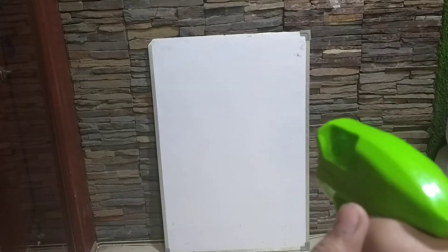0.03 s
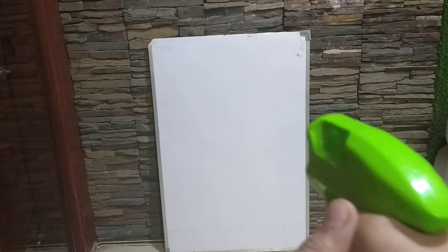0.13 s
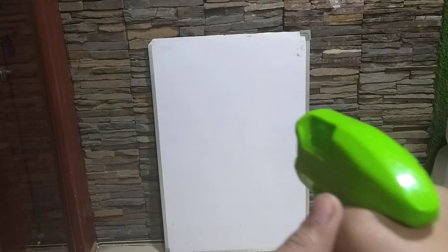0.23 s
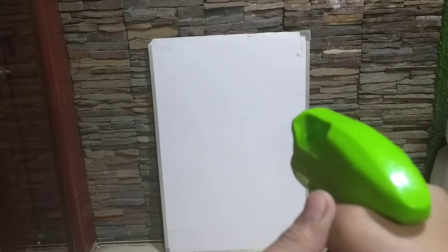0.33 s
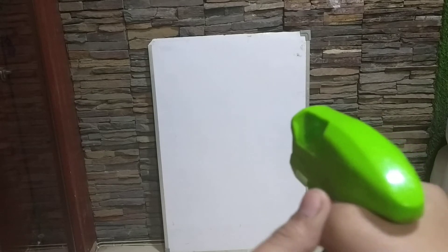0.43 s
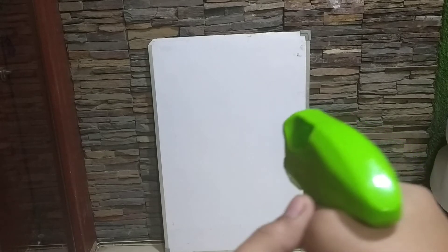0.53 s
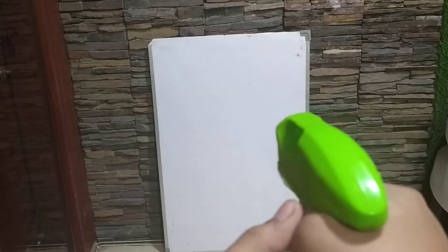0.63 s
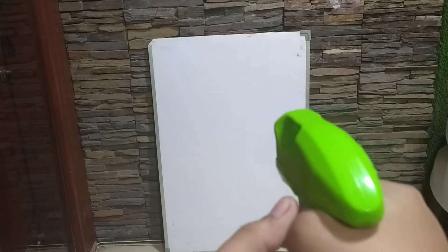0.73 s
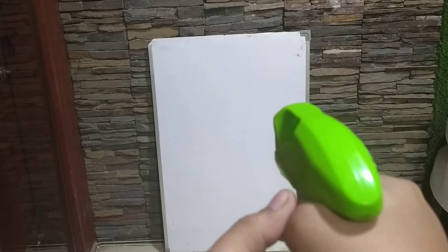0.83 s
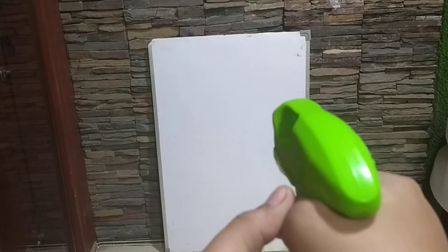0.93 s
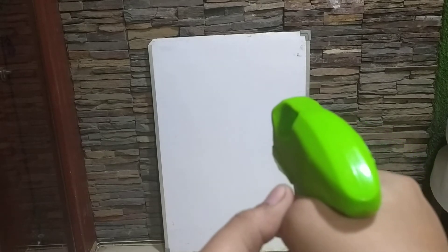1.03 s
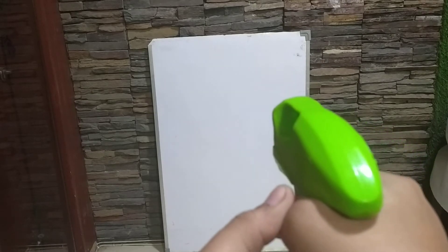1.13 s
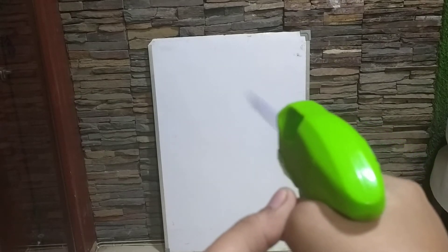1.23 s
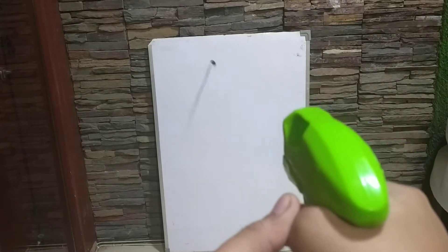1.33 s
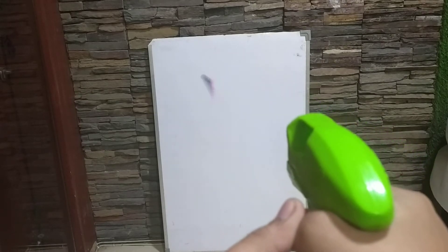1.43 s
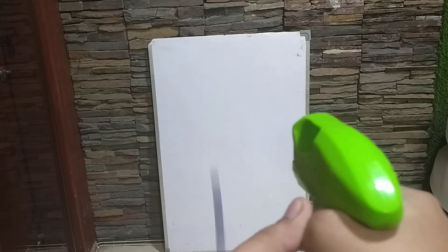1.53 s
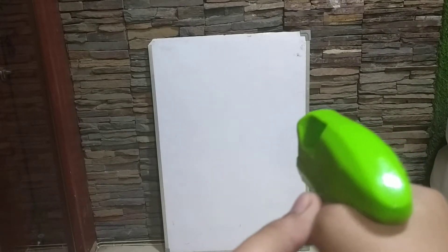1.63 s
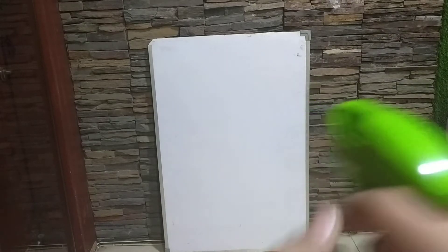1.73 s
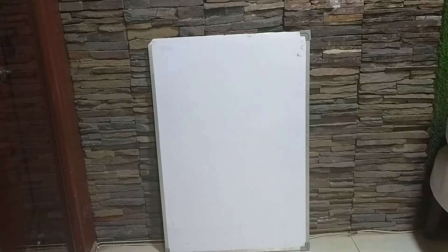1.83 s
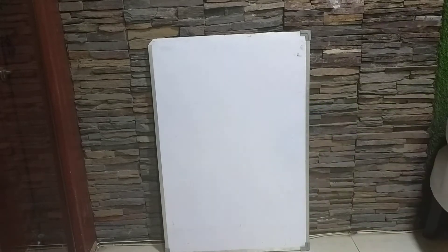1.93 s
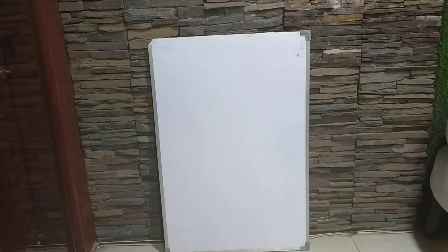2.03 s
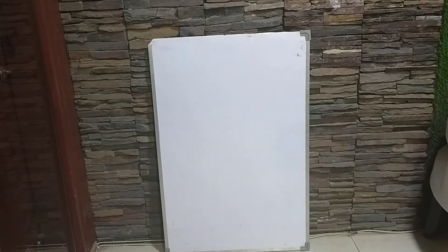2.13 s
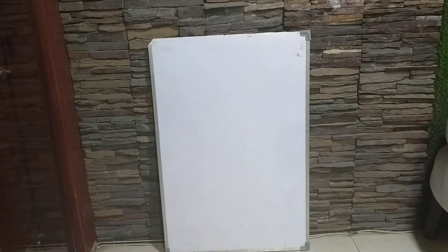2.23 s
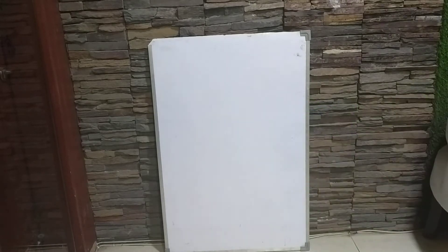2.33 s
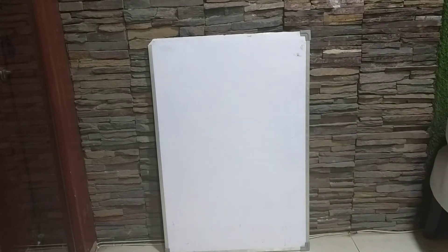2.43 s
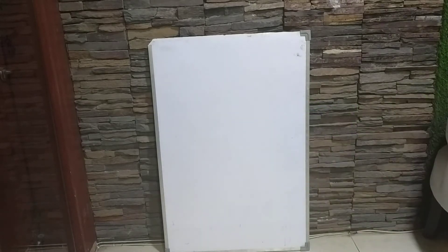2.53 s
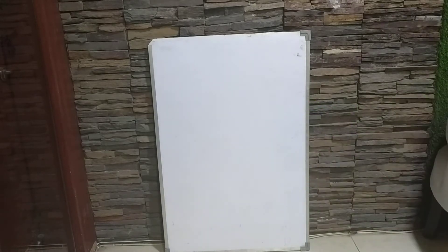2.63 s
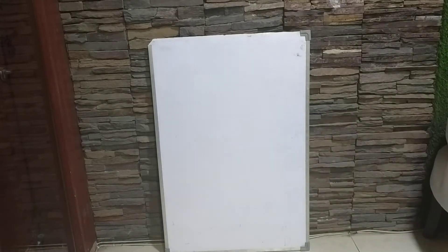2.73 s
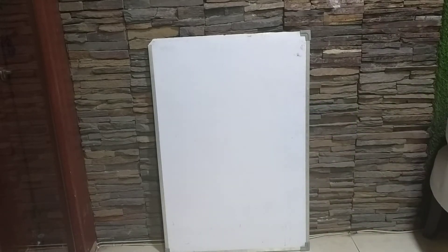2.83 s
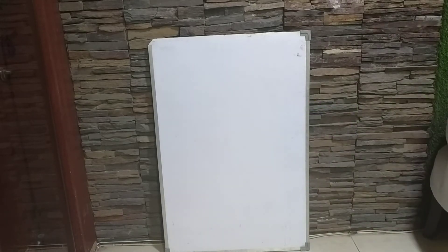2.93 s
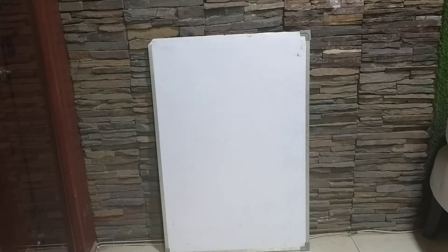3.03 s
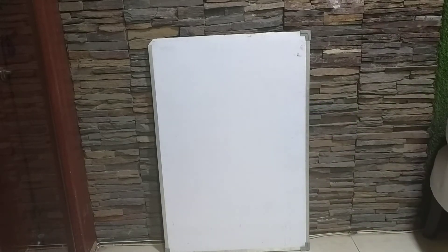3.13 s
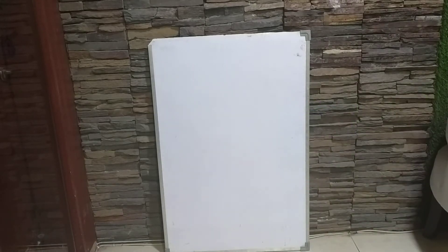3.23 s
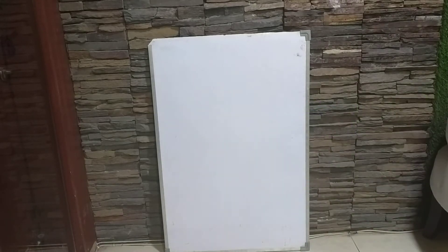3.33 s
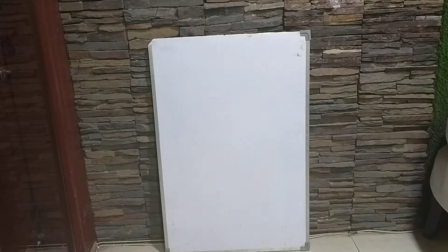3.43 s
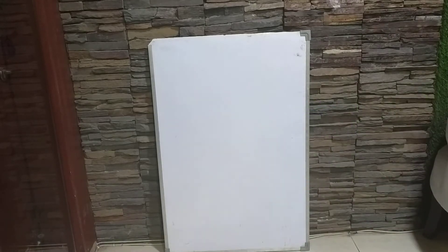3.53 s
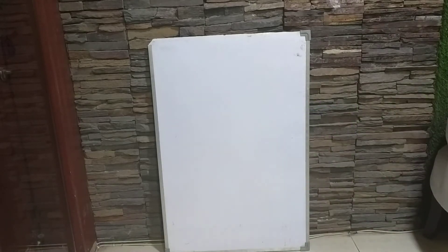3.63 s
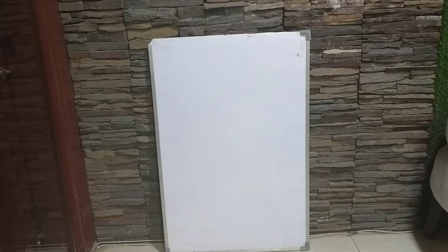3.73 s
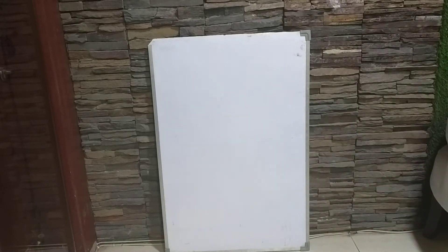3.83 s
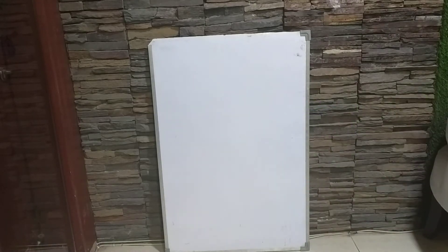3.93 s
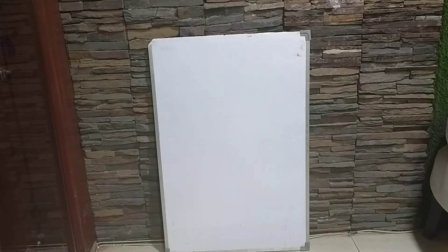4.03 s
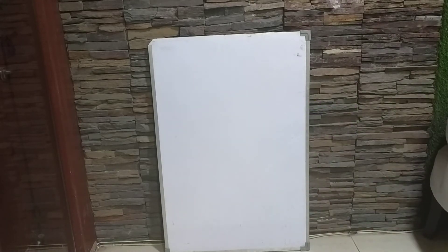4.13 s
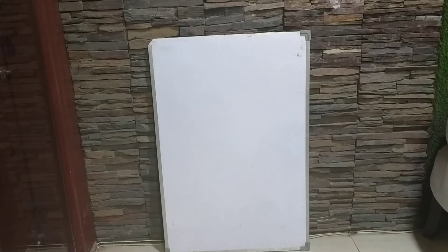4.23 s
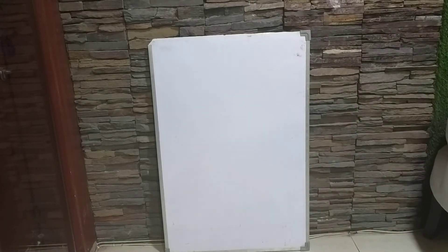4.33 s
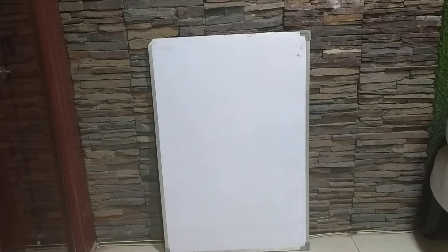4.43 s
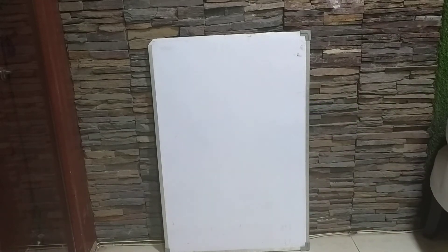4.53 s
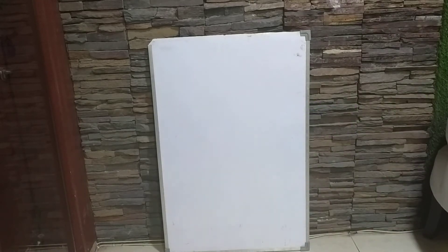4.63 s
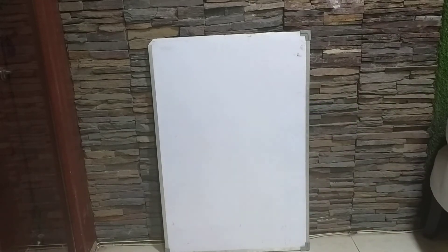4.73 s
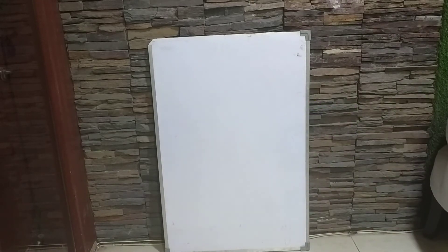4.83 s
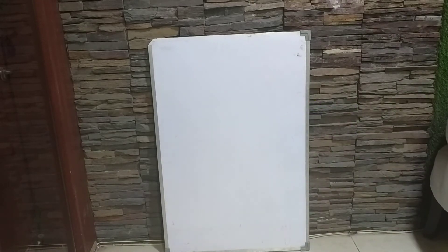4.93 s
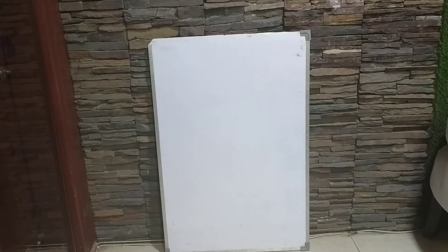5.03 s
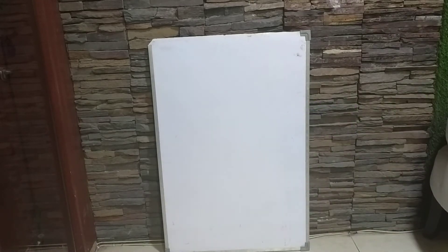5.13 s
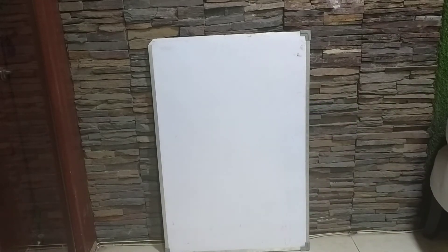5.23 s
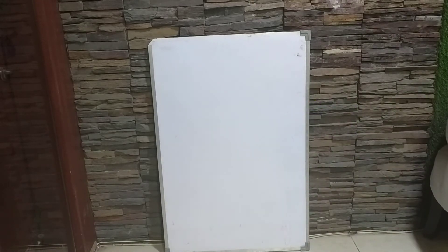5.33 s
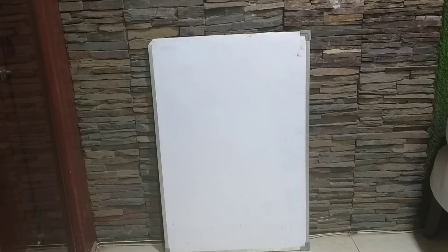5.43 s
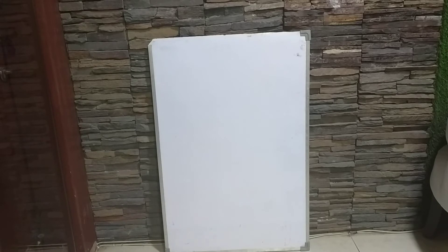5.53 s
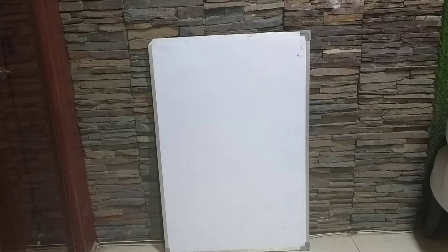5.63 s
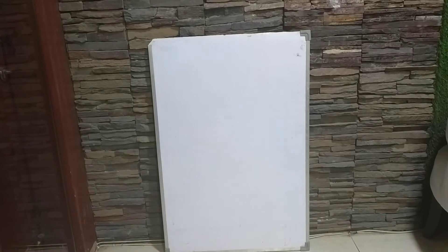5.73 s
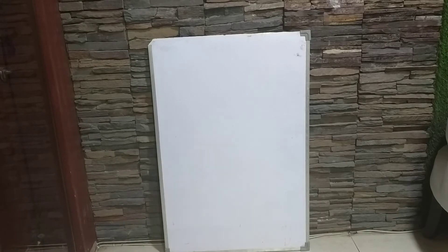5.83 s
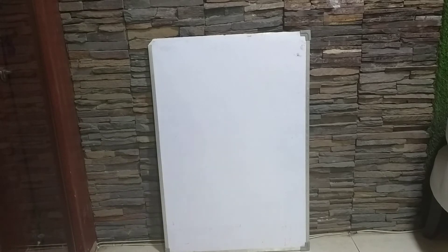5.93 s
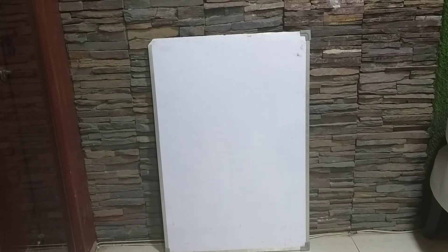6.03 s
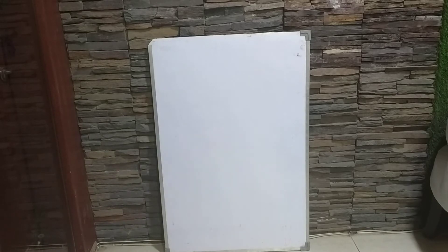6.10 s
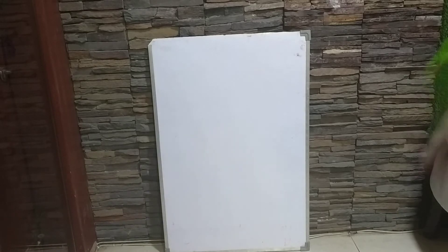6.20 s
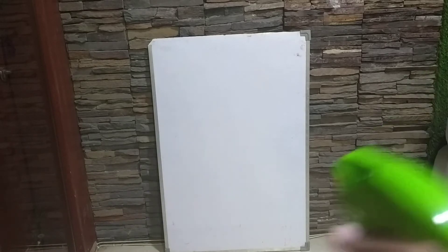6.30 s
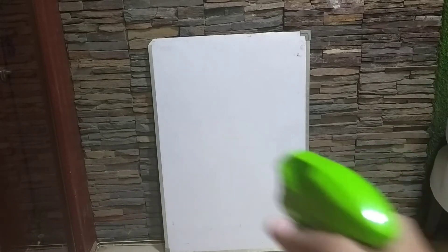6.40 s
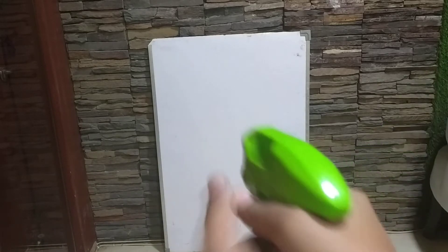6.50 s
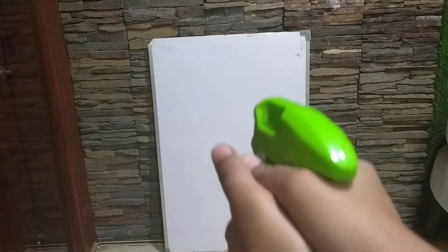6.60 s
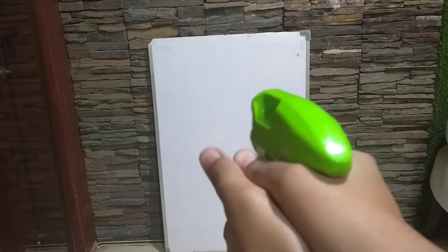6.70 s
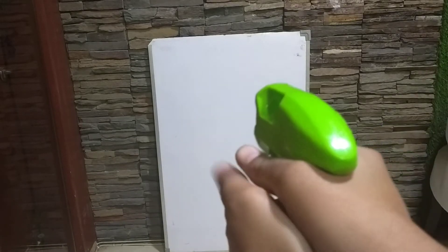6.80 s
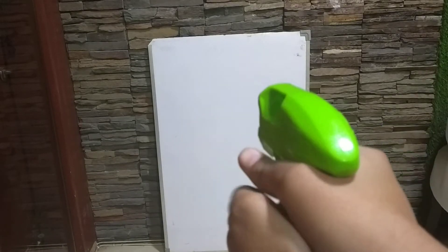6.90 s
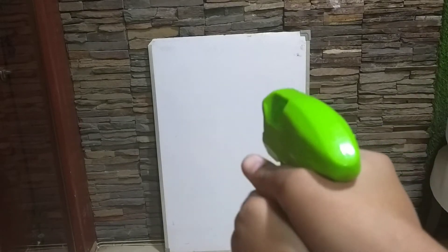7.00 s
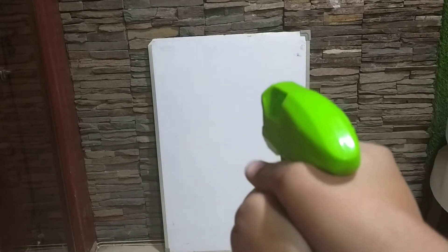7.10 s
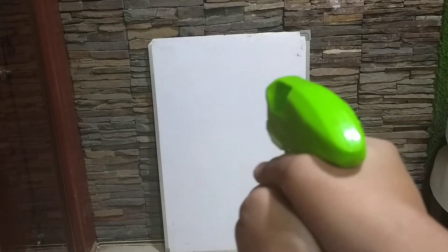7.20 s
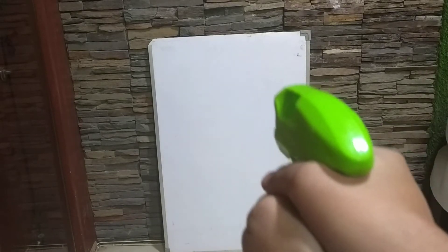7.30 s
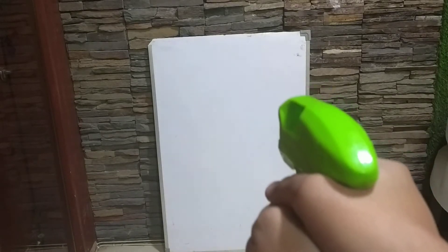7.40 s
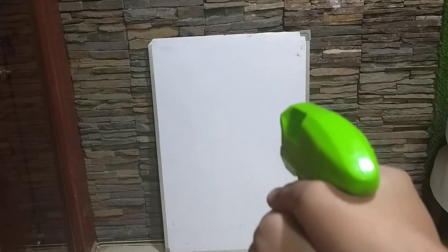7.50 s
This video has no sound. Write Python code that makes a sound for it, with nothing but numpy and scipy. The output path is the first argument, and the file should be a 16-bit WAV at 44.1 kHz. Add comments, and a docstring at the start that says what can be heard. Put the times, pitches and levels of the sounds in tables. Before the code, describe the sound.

A toy blaster snaps sharply, its dart slaps a board an instant later and drops, then quiet plastic clicks and rubbing of reloading.

```python
"""A spring toy blaster fires a foam dart at a whiteboard in a small, hard-walled room with a faint low rumble.
First the catch lets go: filtered noise bursts form the snap; damped modes the recoil, pop, spring and shell.
A tenth of a second later the dart slaps the board, whose panel modes boom, and it then drops to the floor.
Last come cocking and reloading close to a two-port microphone: bursts of noise for the clicks and knocks,
swelling bands of noise for the rubbing. Decaying noise, slower or faster with frequency, answers as the walls."""
import sys
import numpy as np
from scipy import signal
from scipy.fft import rfft, irfft, next_fast_len
from scipy.io import wavfile
from scipy.ndimage import uniform_filter1d, map_coordinates

SR = 44100
rng = np.random.default_rng(int(sys.argv[2]) if len(sys.argv) > 2 else 0)


def store_wav(level_fs):
    """Save 16-bit WAV to argv[1]."""
    pcm = np.round(np.clip(np.atleast_2d(level_fs), -1, 1) * 32767)
    wavfile.write(sys.argv[1], SR, pcm.T.astype(np.int16))


N = 333396
AGE = np.arange(SR) / SR  # time since a blow (s)
CLOCK = np.arange(N) / SR  # time in the scene (s)

# Steady room noise, a rumble with thin hiss. Each row: frequency in Hz, relative level in dB.
AIR_SPECTRUM = [(12, -30), (20, 1), (43, 0), (60, -13), (86, -9.5), (113, -19), (146, -13), (182, -26.5),
                (220, -21), (260, -25.5), (301, -22.5), (590, -38), (698, -35), (949, -40), (4000, -45.5),
                (6720, -45.5), (9500, -43.5), (12100, -45.5), (16000, -67.5)]
# Swells of a far whine. Each row: middle in seconds, level in dB, length in seconds.
WHINE_SWELLS = [(.8, -94.5, .8), (5.95, -89, 0.43)]
# Decay of the walls' answer. Each row: frequency in Hz, t60 in seconds.
WALL_DECAY = [(120, .45), (400, .38), (1000, .52), (3000, 0.52), (8000, .48), (11000, .42), (15000, 0.18)]
# Coherence of the direct sound at the two ports. Each row: frequency in Hz, left-right likeness from 0 to 1.
DIRECT_LIKENESS = [(600, 0.99), (3000, 1), (6000, 0.5), (12000, 0.24)]

# Plastic sliding on plastic. Each row: middle in seconds, level in dB, length in seconds.
SLIDE_STROKES = [(1.95, -71, 0.076), (2.11, -73, 0.11), (2.36, -76.5, .2), (3.02, -58.5, 0.054),
                 (3.37, -75, 0.082), (3.53, -77, .1), (3.72, -69.5, 0.22), (4.04, -75.5, 0.18),
                 (4.21, -73.5, .12), (4.36, -68, 0.049), (4.49, -73, .045), (4.64, -71, 0.045),
                 (4.85, -79, .08), (5.0, -69.5, 0.043), (5.08, -60.5, 0.049), (5.205, -64.5, 0.029),
                 (5.46, -77, .09), (5.605, -70, 0.062), (5.82, -66.5, 0.11), (6.08, -76.5, .36),
                 (6.51, -80.5, .24)]
# Fingers scuffing the hollow shell. Each row: middle in seconds, level in dB, length in seconds.
SCUFF_STROKES = [(3.71, -71, 0.12), (4.08, -80, 0.26), (5.08, -82, 0.084)]
# Friction noise of the slides. Each row: frequency in Hz, relative level in dB.
SLIDE_SPECTRUM = [(300, -33), (1500, -12), (3000, -11), (4400, -7), (6000, -7), (9300, 1), (12000, -7.5),
                  (15500, -14.5)]
# Friction noise of the scuffs. Each row: frequency in Hz, relative level in dB.
SCUFF_SPECTRUM = [(80, -1), (300, -1), (700, -0.5), (1000, -3), (1500, -4.5), (2100, -5), (4000, -13.5),
                  (10000, -40)]
# Plastic clicks of the trigger and of cocking. Each row: start in seconds, level in dB, t60 in seconds.
CLICK_BLOWS = [(1.6727, -47, 0.016), (2.347, -60.5, 0.025), (2.551, -38, 0.019), (2.5548, -37, 0.023),
               (2.5777, -40, 0.018), (2.5978, -20, 0.0086), (2.6016, -35, 0.073), (2.633, -46, .006),
               (2.9240, -48.5, .014), (2.9323, -51.5, 0.028), (4.625, -65.5, .039), (5.2228, -52, 0.026),
               (5.2333, -56, .02), (6.5230, -63.5, 0.019)]
# Colour of the clicking shell. Each row: frequency in Hz, relative level in dB.
SHELL_SPECTRUM = [(100, -28), (300, -7.5), (700, -20), (1500, -8.5), (2100, -10), (2600, -9), (3300, -6.5),
                  (4300, -1.5), (5300, -1.5), (7500, -1.5), (9500, 7.5), (12000, -2), (15500, -9)]
# Dart on the floor and hands on the shell.
# Each row: start in seconds, level in dB, t60 in seconds, resonance in Hz.
KNOCK_BLOWS = [(1.842, -45, 0.027, 518), (1.8515, -51.5, 0.017, 900), (2.2652, -58.5, .022, 620),
               (2.4604, -64, 0.03, 2500), (2.4936, -63, .03, 1700), (2.5391, -54, 0.018, 815),
               (2.55, -56.5, 0.039, 1800), (2.7142, -59.5, 0.03, 1390), (3.012, -59.5, 0.083, 1550),
               (3.645, -67, 0.2, 200), (3.715, -72, .18, 130), (3.97, -75, 0.18, 300),
               (4.8742, -68, .023, 870), (5.07, -73, .1, 1800), (5.098, -69.5, 0.091, 1460),
               (5.464, -73, .04, 1050), (6.498, -73, .053, 1500)]
# Dull colour shared by the knocks, before each one's resonance. Each row: frequency in Hz, relative level in dB.
KNOCK_SPECTRUM = [(60, -23), (150, -8), (400, -5), (700, -7), (1300, -7.5), (2500, -13.5), (5500, -16),
                  (9200, -7.5), (12000, -18), (16000, -35)]

# The dart's tip slaps the board, which chatters in its frame.
# Each row: start in seconds, level in dB, t60 in seconds, room answer in dB.
BOARD_SLAPS = [(1.3423, -11, 0.0024, 1.5), (1.3434, -14, 0.0063, -1), (1.3454, -16.5, 0.0078, -2.5),
               (1.3527, -18.5, 0.0074, -3.5)]
# Colour of the tip's slap. Each row: frequency in Hz, relative level in dB.
TIP_SPECTRUM = [(100, -12.5), (300, 9.5), (850, 5.5), (1500, 0), (3200, -1.5), (4000, -1.5), (4650, -2),
                (5500, 1), (7500, 6.5), (9500, 6), (12000, -0.5), (15500, -5.5)]
# Modes of the board's panel. Each row: frequency in Hz, level in dB, t60 in seconds.
BOARD_MODES = [(168, -49.5, .2), (277, -36.5, 0.12), (337.8, -30.5, 0.18), (382, -34.5, 0.23),
               (487.7, -27.5, 0.22), (618.3, -34.5, 0.1), (687.7, -32.5, 0.15), (773, -36.5, 0.14),
               (833, -32, 0.15), (965, -37.5, 0.21), (1290, -43, .25)]

# The catch lets go and the plunger slams home.
# Each row: start in seconds, level in dB, t60 in seconds, room answer in dB.
SHOT_BLOWS = [(1.2367, -19, .02, -6.5), (1.2439, -18.5, 0.039, -8), (1.2484, -18.5, 0.073, -8.5)]
# Colour of the shot's snap. Each row: frequency in Hz, relative level in dB.
SNAP_SPECTRUM = [(100, -10), (300, -5), (700, -2.5), (1050, 2), (1550, 2.5), (1950, -7), (2600, 1.5),
                 (3700, -2), (5300, -4), (7500, 1), (10000, 2), (12500, -5), (15500, -7)]
# Air modes of the barrel. Each row: frequency in Hz, level in dB, t60 in seconds.
BARREL_MODES = [(806, -6, .019), (596, -19.5, 0.0079), (1116, -14.5, 0.023), (2540, -22, 0.028),
                (2752, -26, 0.032)]
# Modes of the recoil. Each row: frequency in Hz, level in dB, t60 in seconds.
RECOIL_MODES = [(177, -22.5, 0.031), (126.5, -41.5, 0.26), (104.7, -45, 0.24)]
# Modes of the spring and shell. Each row: frequency in Hz, level in dB, t60 in seconds.
SPRING_AND_SHELL_MODES = [(1510, -50.5, 1.0), (2485.6, -46.5, .35), (942, -41.5, 0.35), (1256, -44.5, 0.28)]

RECOIL_S, POP_S, BOARD_S = 1.2378, 1.2440, 1.3428  # starts (s)
LEFT_LEAD_S = .00004  # the shot reaches the left port first (s)
PORT_GAP_M, SOUND_SPEED = .13, 343  # between the microphone ports (m), of sound (m/s)
TOP_HZ = 16000  # band limit of the recorder (Hz)
CLICK_ROOM_DB, BUMP_ROOM_DB = -2.5, -1  # the walls' answer over the direct sound (dB)
STROKE_TAIL_DB, STROKE_T60_S = -5, 0.85  # what lingers of a stroke in the room (dB, s)
SLIDE_SCUFF_DB = -21.5  # every slide also stirs the shell a little (dB)
RUMBLE_DB = -65  # steady room noise (dB)
WHINE_HZ, WHINE_WAVER_HZ = 710, 2.0  # centre of the whine and scale of its random wavering (Hz)


def amp(db):
    """Level law: twenty decibels make a tenfold amplitude."""
    return 10 ** (np.asarray(db) / 20)


def unit(x):
    """Normalisation to a root-mean-square value of 1."""
    return x / np.sqrt(np.mean(x ** 2) + 1e-20)


def along(points, hz):
    """Interpolation of (Hz, value) points on a logarithmic frequency axis."""
    f, v = np.transpose(points)
    return np.interp(np.log(hz + 1), np.log(f + 1), v)


def wobble(rate):
    """Band-limited randomness: a smooth curve through random knots, rate of them a second."""
    knots = rng.standard_normal(int(N * rate / SR) + 4)
    return map_coordinates(knots, [CLOCK * rate])


def filtered(x, response):
    """Linear filtering: the spectrum of x times a response of frequency."""
    n = x.shape[-1]
    m = next_fast_len(n + SR // 2)
    hz = np.fft.rfftfreq(m, 1 / SR)
    return irfft(rfft(x, m) * response(hz), m)[..., :n]


def causal(level_db, size=2048):
    """Minimum phase: folding the cepstrum gives a level curve its causal impulse response, of energy 1."""
    magnitude = amp(level_db(np.fft.rfftfreq(size, 1 / SR)))
    cepstrum = irfft(np.log(magnitude))
    cepstrum[1:size // 2] *= 2
    cepstrum[size // 2 + 1:] = 0
    response = irfft(np.exp(rfft(cepstrum)))
    return response / np.linalg.norm(response)


def diffuse(hz):
    """Diffuse-field coherence: a sinc of port spacing over wavelength, for sound from all sides."""
    return .975 * np.sinc(2 * hz * PORT_GAP_M / SOUND_SPEED)


def spread(two, likeness):
    """Coherence by mid-side mixing: two unrelated signals become left and right of a given likeness."""
    def rotation(hz):
        turn = np.arccos(np.clip(likeness(hz), -1, 1)) / 2
        return np.array([np.cos(turn), np.sin(turn)])

    mid, side = filtered(two, rotation)
    return np.array([mid + side, mid - side])


def rush(spectrum, patchy_db, grain_db=0):
    """Random noise, diffuse and of rms 1, whose colour shifts in patches; grain_db breaks it into tiny slips."""
    grainy = rng.standard_normal((2, N)) * amp(grain_db * wobble(400))
    z = signal.stft(grainy, nperseg=1024)[2]
    patches = rng.standard_normal(z.shape[1:])
    patches = uniform_filter1d(patches, size=7, axis=0)  # over frequency
    patches = uniform_filter1d(patches, size=8, axis=1)  # over time
    noise = signal.istft(z * amp(patchy_db * unit(patches)), nperseg=1024)[1][:, :N]
    return unit(filtered(spread(noise, diffuse), lambda hz: amp(along(spectrum, hz))))


def add(track, s, sound):
    """Superposition: a sound is summed into the track at s seconds."""
    part = track[:, round(s * SR):][:, :sound.shape[-1]]
    part += sound[..., :part.shape[-1]]


def in_room(sound, room_db, build=0.002):
    """Reverberation: the walls' answer builds up, then decays at its own speed at each frequency."""
    hz, t, z = signal.stft(rng.standard_normal((2, SR)), SR, nperseg=256)
    decay = amp(-60 * t / along(WALL_DECAY, hz)[:, None])
    tail = signal.istft(z * decay, SR, nperseg=256)[1][:, :SR]
    tail = spread(tail, diffuse) * (1 - np.exp(-(AGE / build) ** 2))
    tail = tail / np.linalg.norm(tail[0])
    source = np.atleast_2d(sound)[:1]  # the left channel excites the walls
    answer = signal.fftconvolve(source, tail, axes=1)
    return sound + amp(room_db) * answer[:, :SR]


def swells(table):
    """Gaussian power envelopes: each swell is at half power at the ends of its length."""
    return sum(amp(db) ** 2 * .5 ** ((2 * (CLOCK - s) / length) ** 2) for s, db, length in table)


def background():
    """Stationary noise, a low rumble with thin hiss, and a frequency-modulated far whine that comes and goes."""
    air = amp(RUMBLE_DB) * rush(AIR_SPECTRUM, patchy_db=1.5)
    whine_hz = WHINE_HZ + WHINE_WAVER_HZ * wobble(6)
    phase = 2 * np.pi * np.cumsum(whine_hz) / SR
    return air + np.sqrt(swells(WHINE_SWELLS)) * unit(np.sin(phase))


def contact(t60, body):
    """Impact excitation: a decaying crackle convolved with the response of the struck body, in stereo."""
    fade = amp(-60 * AGE / t60)
    crackle = rng.standard_normal((2, SR)) * fade
    crackle *= np.linalg.norm(fade) / np.linalg.norm(crackle, axis=1, keepdims=True)
    direct = spread(crackle, lambda hz: along(DIRECT_LIKENESS, hz))
    return signal.fftconvolve(direct, body[None], axes=1)[:, :SR]


def contacts(table, spectrum):
    """Repeated impact: a series of contacts on one body, each answered by the room."""
    track = np.zeros((2, N))
    body = causal(lambda hz: along(spectrum, hz))
    for s, db, t60, room_db in table:
        add(track, s, amp(db) * in_room(contact(t60, body), room_db))
    return track


def strokes(table):
    """Friction envelopes: each hand stroke speeds up, slows down and lingers by exponential room decay."""
    power = swells(table)
    decay = amp(-60 * AGE / STROKE_T60_S) ** 2
    lingering = signal.fftconvolve(power, decay / decay.sum())[:N]
    return np.sqrt(np.abs(power + amp(STROKE_TAIL_DB) ** 2 * lingering))


def reloading():
    """Impact and friction: plastic clicks, gritty hissing slides, and fingers scuffing the hollow shell."""
    sliding = strokes(SLIDE_STROKES)
    scuffing = np.hypot(strokes(SCUFF_STROKES), amp(SLIDE_SCUFF_DB) * sliding)  # powers add
    slide = sliding * rush(SLIDE_SPECTRUM, patchy_db=2.5, grain_db=1.5)
    scuff = scuffing * rush(SCUFF_SPECTRUM, patchy_db=4.0, grain_db=2.5)
    clicks = contacts([(*click, CLICK_ROOM_DB) for click in CLICK_BLOWS], SHELL_SPECTRUM)
    return clicks + slide + scuff


def knocks(ring_db=14, octaves=0.24):
    """Local resonance: soft knocks and scrapes, where each spot that is touched has its own spectral peak."""
    track = np.zeros((2, N))
    for s, db, t60, ring_hz in KNOCK_BLOWS:
        def level_db(hz):
            distance = np.log2((hz + 1) / ring_hz) / octaves
            return along(KNOCK_SPECTRUM, hz) + ring_db / (1 + distance ** 2)

        add(track, s, amp(db) * in_room(contact(t60, causal(level_db)), BUMP_ROOM_DB))
    return track


def ring(modes, attack):
    """Modal superposition: damped sines swell over the attack time (s), neighbours in opposite directions."""
    swing = 0
    for k, (hz, db, t60) in enumerate(modes):
        swing = swing + (-1) ** k * amp(db - 60 * AGE / t60) * np.sin(2 * np.pi * hz * AGE)
    return swing * (1 - np.exp(-AGE / attack))


def whiteboard():
    """Plate vibration: the dart slaps the board, whose panel takes a few milliseconds to start booming."""
    track = contacts(BOARD_SLAPS, TIP_SPECTRUM)
    add(track, BOARD_S, in_room(ring(BOARD_MODES, attack=0.0045), room_db=-12.0))
    return track


def blaster():
    """Impulsive release: a snap, recoil, the barrel air's pop as the dart leaves; spring and shell ring on."""
    track = contacts(SHOT_BLOWS, SNAP_SPECTRUM)
    add(track, RECOIL_S, in_room(ring(RECOIL_MODES, attack=.001), room_db=-13))
    add(track, POP_S, in_room(ring(BARREL_MODES, attack=.0006), room_db=-12.5, build=.003))
    add(track, POP_S, ring(SPRING_AND_SHELL_MODES, attack=.002))
    sides = np.array([[1], [-1]])  # left early and louder, right late and softer
    shifted = filtered(track, lambda hz: np.exp(1j * np.pi * hz * LEFT_LEAD_S * sides))
    return shifted * amp(sides * 0.58)


def scene():
    """Superposition of shot, impact, fall and reload over the quiet room."""
    return background() + reloading() + knocks() + whiteboard() + blaster()


def record(dry):
    """Band limiting: a steep low-pass leaves almost nothing above the recorder's top frequency."""
    return filtered(dry, lambda hz: 1 / (1 + (hz / TOP_HZ) ** 120))


dry = scene()
out = record(dry)
store_wav(out)
```